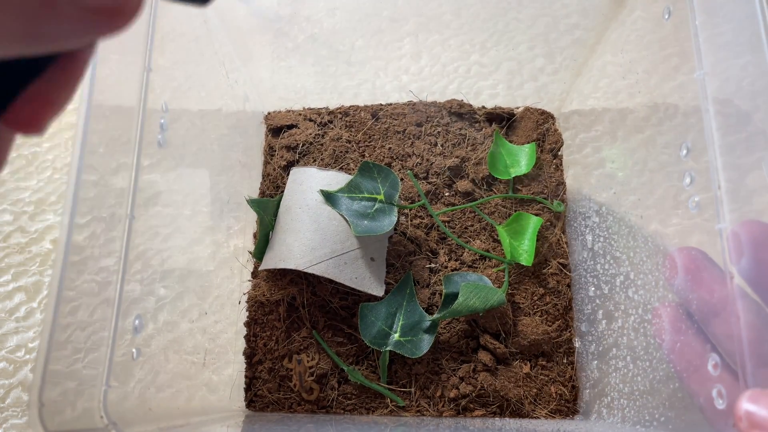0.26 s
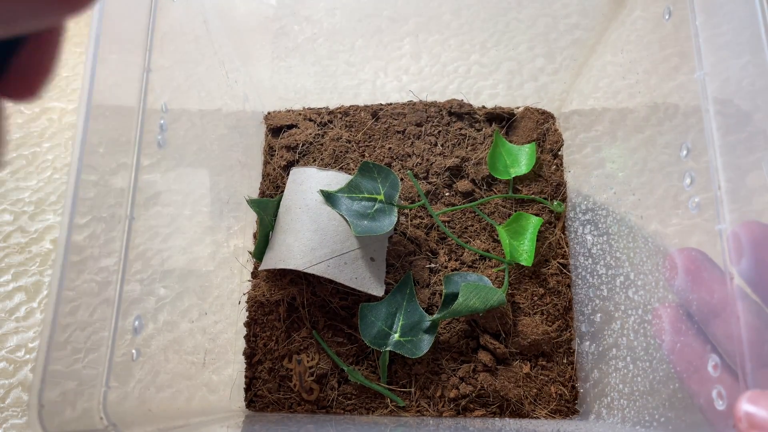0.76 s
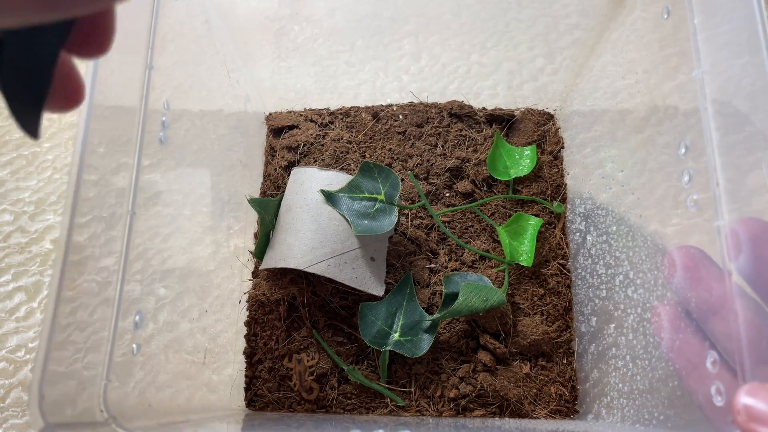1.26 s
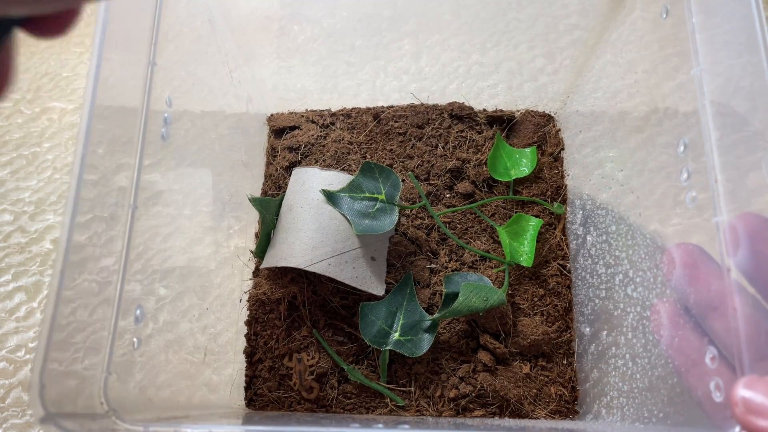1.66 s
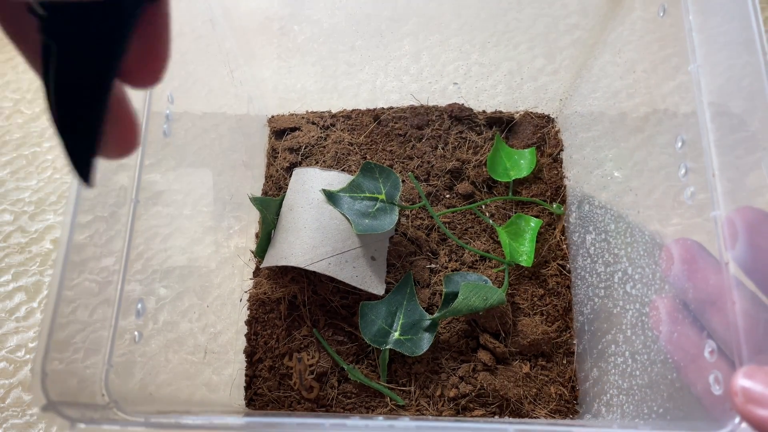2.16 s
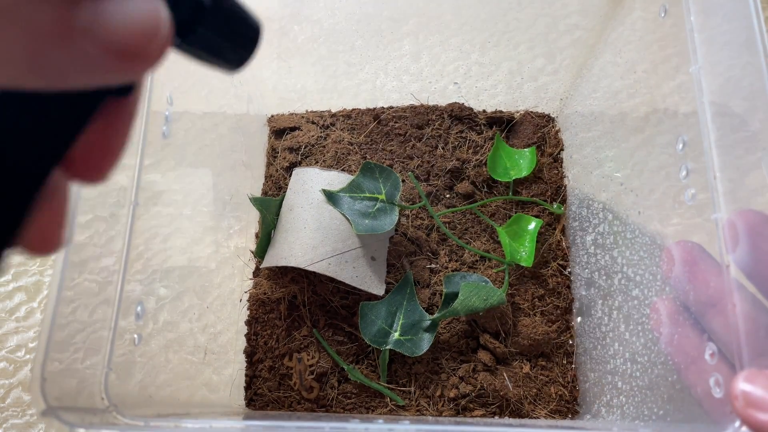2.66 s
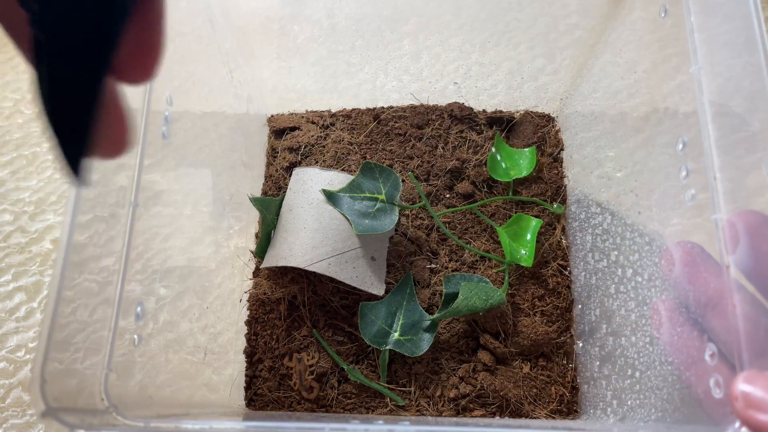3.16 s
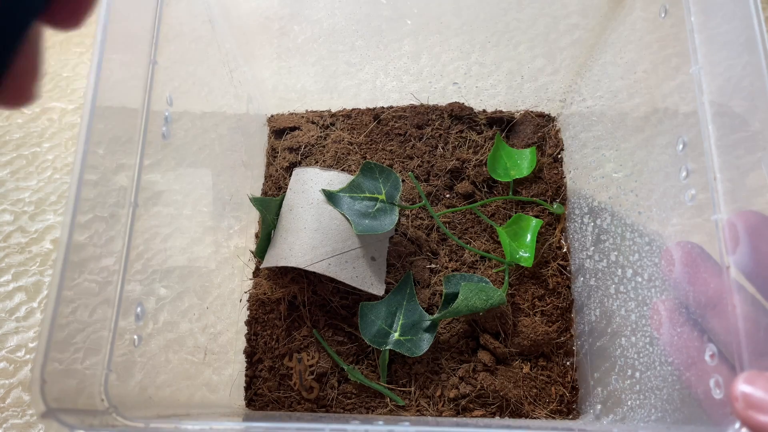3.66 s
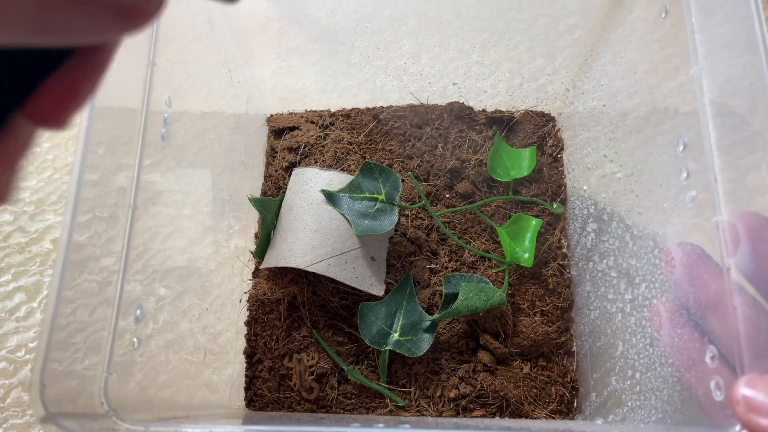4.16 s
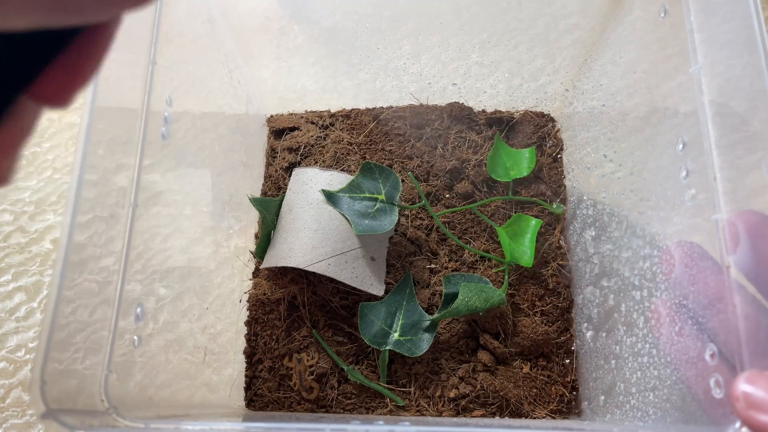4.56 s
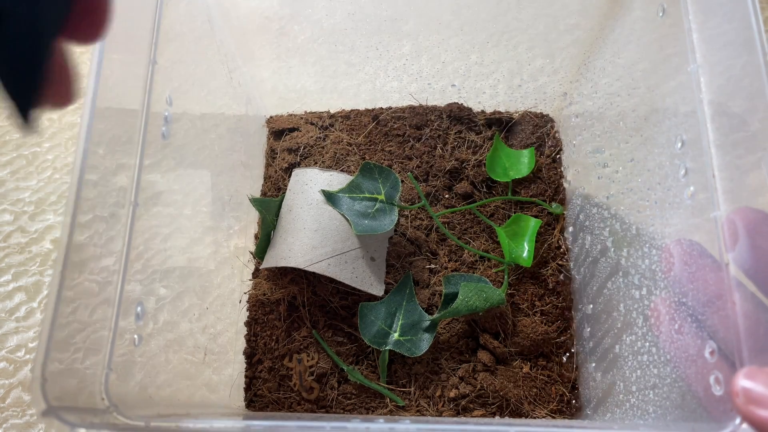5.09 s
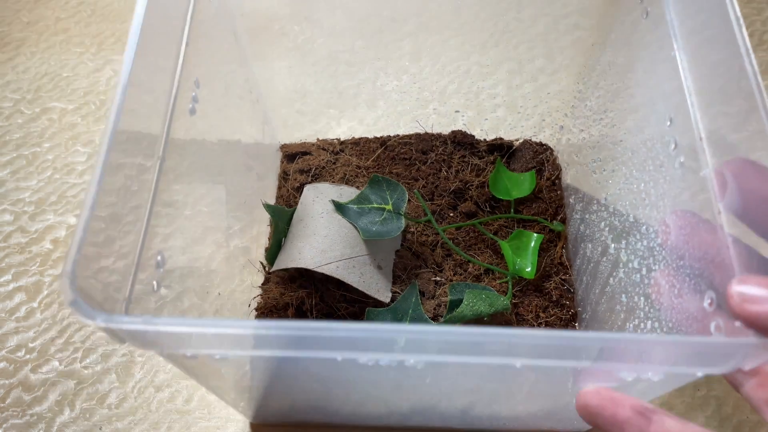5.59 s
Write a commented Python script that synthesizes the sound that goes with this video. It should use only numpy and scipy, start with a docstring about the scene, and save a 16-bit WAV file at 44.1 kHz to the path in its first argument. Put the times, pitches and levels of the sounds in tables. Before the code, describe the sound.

Rapid trigger pulls chatter and clack while short bursts of mist hiss into a plastic container of soil, heard close indoors.

```python
"""In a small quiet room, a hand spray bottle is pumped 21 times, ever more briskly, over a plastic tub of soil.
Each pull makes the pump chatter in a quickening run of ticks, built from impulses and noise, that knock the bottle.
Shaped random impacts then hiss as mist and rush into the tub; the trigger clacks back into its ringing spray head.
Gliding tones make the water's groans. At the end the lifted tub wobbles and knocks, with a faint, blurred, rising
tone. All is heard close."""
import sys
import numpy as np
from scipy import signal
from scipy.fft import irfft
from scipy.io import wavfile
from scipy.ndimage import uniform_filter1d

SR = 44100
rng = np.random.default_rng(int(sys.argv[2]) if len(sys.argv) > 2 else 0)


def generate_wav(sig):
    """Save sig (samples, or channels by samples) to the path in sys.argv[1] as 16-bit PCM at SR."""
    pcm = np.round(np.clip(np.atleast_2d(sig).T, -1, 1) * 32767).astype(np.int16)
    wavfile.write(sys.argv[1], SR, pcm)


N = 257217
HZ = np.fft.rfftfreq(4096, 1 / SR)
TIME = np.arange(N) / SR


def gain_of(db):
    """Decibels to gain."""
    return 10 ** (np.asarray(db) / 20)


def read(points, hz):
    """A spectrum, joined by straight lines over log frequency."""
    f, value = np.transpose(points)
    return np.interp(np.log(hz + 1), np.log(f + 1), value)


def at_time(curve, s):
    """A control curve, joined by straight lines over time."""
    return np.interp(s, *np.transpose(curve))


def add(mix, s, part):
    """Adds part to mix from time s on."""
    span = mix[max(round(s * SR), 0):][:len(part)]
    span += part[:len(span)]


def fall(db, decay_s):
    """Power of a blow that dies exponentially."""
    return gain_of(db) ** 2 * np.exp(-TIME[:SR // 10] / decay_s)


def swells(rows):
    """Power of short bursts that rise quickly and fade more slowly."""
    power = np.zeros(N)
    for s, db, length in rows:
        u = np.linspace(0, 1, max(int(length * SR), 8))
        add(power, s, gain_of(db) ** 2 * np.sin(np.pi * u ** 0.59) ** 2)
    return power


def flutter(depth_db, size):
    """Random unsteadiness of a flow, as a factor on its power."""
    wander = uniform_filter1d(uniform_filter1d(rng.standard_normal(N), size), size)
    return gain_of(depth_db * wander / wander.std()) ** 2


def fizz(power, grain_db=0., per_s=SR):
    """A random train of tiny impacts of uneven size that carries the given power."""
    hits = rng.random(N) < per_s / SR
    size = gain_of(grain_db * np.minimum(rng.exponential(1, N), 4)) * hits
    return rng.standard_normal((2, N)) * size / np.sqrt(np.mean(size ** 2)) * np.sqrt(power)


def blows(rows, spread=.0004):
    """Single clean impacts (s, dB over a millisecond), a random fraction of the spread later in one channel."""
    out = np.zeros((2, N))
    for (s, db), late in zip(rows, rng.random(len(rows))):
        push = gain_of([db]) * np.sqrt(SR / 1000)
        add(out[0], s, push)
        add(out[1], s + spread * late, push)
    return out


def from_left(x, right_db=-5):
    """A sound on the left is softer and a little later in the right channel."""
    return np.array([x, gain_of(right_db) * np.roll(x, 16)])


# stereo image by frequency:
# (frequency [Hz], left over right [dB], likeness [0-1], phase lead of the left [rad])
STEREO_IMAGE = [(60, 3, .9, 0), (450, 5.5, .88, 1.6), (1000, 6, .92, 3.1), (1800, 4.6, .78, 4.1),
                (2800, 4.5, .55, 7.7), (4800, 9, .25, 10.8), (6500, 5.3, .45, 12.1), (7800, 4.5, .7, 9.7),
                (8700, 2, .8, 9.4), (9700, -1, .88, 7.9), (10700, 0, .93, 6.5), (12400, 0, .94, 6),
                (14000, 0, .88, 3.5), (16000, 0, .92, 2.9)]


def ring(drive, spectrum, modes=(), image=STEREO_IMAGE):
    """Sends a drive through a causal resonant body and spreads it over a stereo image."""
    db = read(spectrum, HZ)
    db = db + sum(lift / (1 + (2 * (HZ - hz) / width) ** 2) for hz, width, lift in modes)
    gain = gain_of(db) / np.sqrt(np.mean(gain_of(db) ** 2))
    # minimum phase: the body answers only after it is struck
    log_gain = np.log(np.r_[gain, gain[-2:0:-1]] + 1e-5)
    body = np.exp(np.conj(signal.hilbert(log_gain)))[:len(HZ)]
    f, *columns = np.transpose(image)
    balance_db, same, lead = (np.interp(HZ, f, c) for c in columns)
    same, lean = np.clip(same, 0, 1), gain_of(balance_db)
    right = body * np.sqrt(2 / (1 + lean ** 2))
    # left, shared part of the right, and the right's independent part
    paths = [right * lean, right * same * np.exp(-1j * lead), right * np.sqrt(1 - same ** 2)]
    taps = np.roll(irfft(np.array(paths)), 64, axis=1)  # leaves space for a right channel that leads
    heard = signal.oaconvolve(drive[[0, 0, 1]], taps, axes=1)[:, 64:64 + N]
    return np.array([heard[0], heard[1] + heard[2]])


# trigger pulls: (time [s], chatter length [s], first gap [s], first tick before trim [dB],
# later ticks before trim [dB])
TRIGGER_PULLS = [(0.1627, 0.049, 0.013, -20.5, -21.5), (0.453, 0.031, .0113, -21, -21),
                 (0.7527, 0.026, 0.0098, -19, -23.5), (1.0496, 0.026, .0095, -20, -20.5),
                 (1.3531, 0.02, 0.0082, -26.5, -17.5), (1.6515, 0.018, 0.0089, -23, -19),
                 (1.951, 0.019, 0.0083, -24, -17.5), (2.1991, 0.021, 0.01, -17, -18.5),
                 (2.4375, 0.023, 0.0084, -22.5, -18.5), (2.6826, 0.022, 0.0093, -23.5, -19.5),
                 (2.9497, 0.031, 0.011, -18, -18.5), (3.1766, .024, 0.0085, -17, -19.5),
                 (3.405, 0.023, 0.0093, -22, -21.5), (3.6392, 0.024, 0.0085, -17.5, -21),
                 (3.849, 0.0178, .008, -22.5, -20), (4.0566, 0.023, 0.0095, -22, -21),
                 (4.28, 0.013, 0.0071, -27.5, -23), (4.5123, 0.018, 0.0077, -22, -21.5),
                 (4.7466, 0.022, 0.0084, -16, -17), (4.966, 0.013, 0.0099, -17, -14),
                 (5.1617, 0.026, .0098, -19.5, -18.5)]
# the trigger springing back, once before the first pull and once after each:
# (time [s], snap before trim [dB], ring of the spray head before trim [dB])
TRIGGER_RETURNS = [(0.056, -31, -43.5), (0.358, -24, -40.5), (0.6351, -20.5, -38.5), (0.9764, -29.5, -39.5),
                   (1.2535, -22.5, -38.5), (1.5834, -22.5, -40), (1.8517, -17.5, -38), (2.1328, -23, -36),
                   (2.3709, -26, -38), (2.611, -24, -36.5), (2.8924, -34, -41.5), (3.128, -21.5, -39.5),
                   (3.345, -30, -35.5), (3.5862, -24, -33.5), (3.8, -24.5, -38), (3.9984, -33, -43.5),
                   (4.2382, -31, -40.5), (4.4546, -31, -33), (4.6898, -22, -33.5), (4.9132, -20, -36.5),
                   (5.109, -21, -34), (5.296, -19, -36)]
# the finger eases off this long before a return; a full squirt empties the chamber
EASE_OFF_S, FULL_SQUIRT_S = 0.059, 0.1


def flow(level_curve, rise_s, hold, fade_db_per_s, sag_db, flight_s=0., db=0.):
    """Power of the jet after its flight: it builds up, sags as the piston travels, dies as pressure runs out."""
    power, t = np.zeros(N), TIME[:SR // 3]
    for (s, chatter_s, *_), (back_s, *_) in zip(TRIGGER_PULLS, TRIGGER_RETURNS[1:]):
        start = s + chatter_s
        length = np.clip(back_s - EASE_OFF_S - start, t[1], FULL_SQUIRT_S)
        sag = sag_db * (.5 - t / length)
        fade = fade_db_per_s * np.maximum(t - hold * length, 0)
        level = gain_of(db + at_time(level_curve, s) + sag - fade) ** 2
        add(power, start + flight_s, level * (1 - np.exp(-(t / rise_s) ** 2)))
    return power


def gripped(drive, spectrum, modes, detune, count=3):
    """Each stroke draws one of a few finger grips, which shifts the resonances of the spray head."""
    stroke = np.searchsorted([s for s, *_ in TRIGGER_RETURNS], TIME + EASE_OFF_S)
    grip = rng.integers(0, count, len(TRIGGER_RETURNS) + 1)[stroke]
    out = np.zeros((2, N))
    for k, scale in enumerate(1 + detune * np.linspace(-1, 1, count)):
        shifted = [(hz * scale, width, lift) for hz, width, lift in modes]
        out += ring(drive * (grip == k), spectrum, shifted)
    return out


# colour of the room air and rubbing: (frequency [Hz], relative level [dB])
QUIET_COLOUR = [(70, -10.5), (200, -21.5), (550, 6), (1100, 12), (4500, -2.5), (13000, -3.5),
                (16000, -31.5)]
# course of the room air and rubbing: (time [s], level [dB])
QUIET_LEVEL = [(0, -71), (5.3, -63.5), (5.6, -67.5), (5.72, -78.5), (5.83, -76.5)]


def rustle():
    """Faint room air and rubbing of the hand against the tub: gently wavering, coloured noise."""
    power = gain_of(at_time(QUIET_LEVEL, TIME)) ** 2
    return ring(fizz(power * flutter(1., size=1500)), QUIET_COLOUR)


# how long the room rings: (frequency [Hz], time to fall by 60 dB [s])
ROOM_DECAY = [(150, 0.11), (600, 0.15), (2000, 0.47), (5000, 0.28), (10000, 0.24), (16000, 0.073)]


def room(x, first_s=0.0056):
    """Sparse reflections of random sign, each band dying at its own speed, fed from the left channel."""
    signs = rng.choice([-1., 1.], (2, SR // 2))
    hits = rng.random((2, SR // 2)) < 4000 / SR
    taps = signs * hits * (TIME[:SR // 2] > first_s)
    hz, t, z = signal.stft(taps, SR, nperseg=256)
    decay = gain_of(-60 * t / read(ROOM_DECAY, hz)[:, None])
    tail = signal.istft(z * decay, SR, nperseg=256)[1]
    return signal.fftconvolve(x[:1], tail / np.linalg.norm(tail[0]), axes=1)[:, :N]


# the edge below which the bass thins out: (time [s], frequency [Hz])
BASS_EDGE = [(1.15, 29.8), (1.3, 419.5), (1.9, 925), (2.0, 426.6), (3.25, 237), (3.65, 464.4), (4.5, 352),
             (4.65, 100), (5.3, 267.2)]


def thin_bass(x, depth_db=-17.5, order=10):
    """The bass comes and goes: everything below a wandering edge is much weaker."""
    hz, t, z = signal.stft(x, SR, nperseg=512)
    above = (hz[:, None] / at_time(BASS_EDGE, t)) ** order
    gain = np.maximum(above / (1 + above), gain_of(depth_db))
    return signal.istft(z * gain, SR)[1][:, :N]


# gulps of the water in the bottle:
# (time [s], level [dB], length [s], starting pitch [Hz], final pitch [Hz])
WATER_GULPS = [(0.177, -52, 0.038, 70, 227), (0.366, -55, 0.073, 418, 300), (0.391, -57.5, 0.079, 65, 95),
               (0.457, -45.5, 0.055, 79.6, 282), (0.749, -50, 0.04, 130, 300), (1.05, -44, 0.043, 81, 256),
               (2.599, -49, 0.06, 584, 766), (2.962, -54, 0.046, 95, 171), (4.755, -51.5, 0.035, 130, 231),
               (4.975, -47, 0.032, 170, 224)]
# draught that a squirt throws at the microphone: (time [s], level [dB])
DRAUGHT_LEVEL = [(.16, -58), (.75, -59.5), (1.35, -90)]
# colour of hand and draught: (frequency [Hz], relative level [dB])
RUMBLE_COLOUR = [(25, -52), (60, -0.5), (260, -5.5), (450, -10), (1200, -53.5)]


def handling(grip_db=-69, grip_until_s=1.17, rest_db=-88, opening_db=-52, opening_s=0.016):
    """Water groans with an unsteady glide; at first the hand rumbles and draughts ruffle the microphone."""
    gulps = np.zeros(N)
    for s, db, length, first_hz, last_hz in WATER_GULPS:
        hz = np.geomspace(first_hz, last_hz, int(length * SR))
        hz = hz * (1 + uniform_filter1d(rng.standard_normal(len(hz)), size=100))
        tone = np.sin(2 * np.pi * np.cumsum(hz) / SR)
        add(gulps, s, gain_of(db) * np.sqrt(2) * tone * np.hanning(len(hz)))
    draught = flow(DRAUGHT_LEVEL, rise_s=0.017, hold=1.0, fade_db_per_s=136.0, sag_db=1.5, flight_s=0.016)
    add(draught, 0, fall(opening_db, opening_s))
    hand = gain_of(np.where(TIME < grip_until_s, grip_db, rest_db)) ** 2
    rumble = fizz((draught + hand) * flutter(2.14, size=700))
    return from_left(gulps) + ring(rumble, RUMBLE_COLOUR)


def rising_tone(s=5.595, length_s=0.063, hz=4750, glide_hz_per_s=11000, db=-71):
    """A faint, blurred, rising tone as the tub is lifted: a gliding sine scaled by slow noise."""
    out, t = np.zeros(N), TIME[:int(length_s * SR)]
    blur = uniform_filter1d(rng.standard_normal(len(t)), size=220)
    tone = np.sin(2 * np.pi * np.cumsum(hz + glide_hz_per_s * t) / SR)
    add(out, s, gain_of(db) * blur / blur.std() * tone * signal.windows.tukey(len(t), .5))
    return out


# knocks on the tub as it is lifted: (time [s], level before trim [dB])
LIFT_KNOCKS = [(5.592, -44.5), (5.7688, -63)]
# colour of the tub's knocked wall: (frequency [Hz], relative level [dB])
WALL_COLOUR = [(400, -13.5), (1000, -7), (1500, 8.5), (2400, -4), (3200, -13), (4300, 0), (7500, -33)]
# colour of shifting soil and of the jet's low rush: (frequency [Hz], relative level [dB])
RUSH_COLOUR = [(60, -25.5), (180, -5), (300, -5), (480, -0.5), (750, 2), (1100, -6), (2000, -6.5),
               (6000, -24)]
# resonances of the tub's hollow: (frequency [Hz], width [Hz], lift [dB])
TUB_MODES = [(357, 13, 6.5), (488, 130, 9.5), (736, 79, -6), (1058, 160, 9)]


def tub(flex_at=5.48, flex_hz=84, glide_hz_per_s=130, flex_db=-59, flex_s=0.053):
    """The lifted tub flexes with a low sinking wobble, its wall knocks, and the soil shifts."""
    knocks, wobble = np.zeros((2, N))
    for s, db in LIFT_KNOCKS:
        add(knocks, s, fall(db - 0.5, 0.0035))
    t = TIME[:SR // 4]
    swell = (t / flex_s * np.exp(1 - t / flex_s)) ** 3
    tone = np.sin(2 * np.pi * np.cumsum(flex_hz - glide_hz_per_s * t) / SR)
    add(wobble, flex_at, gain_of(flex_db) * swell * tone)
    wall = ring(fizz(knocks), WALL_COLOUR, [(2554, 130, 14)])
    soil = ring(fizz(swells([(5.615, -58.5, 0.047)])), RUSH_COLOUR, TUB_MODES)
    return wall + wobble + soil


# soft peeps of the valve, shortly before a few of the pulls: (time [s], level [dB])
VALVE_PEEPS = [(1.038, -43.5), (1.94, -42.5), (3.167, -43)]
PEEP_HZ, PEEP_S = 2200, 0.0085


def valve():
    """A very short soft peep from the valve: a sine with smoothed ends."""
    out, t = np.zeros(N), TIME[:int(PEEP_S * SR)]
    tone = np.sin(2 * np.pi * PEEP_HZ * t) * signal.windows.tukey(len(t), .5)
    for s, db in VALVE_PEEPS:
        add(out, s, gain_of(db) * 2 * tone)
    return from_left(out)


# colour of the swell before a pull and of the head's hollow note: (frequency [Hz], relative level [dB])
DULL_COLOUR = [(200, -22), (2250, -9.5), (16000, -25.5)]
# colour of the ticks: (frequency [Hz], relative level [dB])
TICK_COLOUR = [(200, -43), (3000, -10.5), (5000, -5.5), (7500, -4.5), (9500, 3), (10900, -3), (11900, -0.5),
               (15600, 1), (17000, -40)]


def lead_in(lead_s=0.016, length_s=0.021, swell_db=-52, tick_db=-19, tick_lead_s=0.0041):
    """A faint noisy swell and faint ticks lead into each pull, both made of sparse random impacts."""
    swell = swells([(s - lead_s, swell_db, length_s) for s, *_ in TRIGGER_PULLS])
    ticks = swells([(s - tick_lead_s, first_db + tick_db, 2 * tick_lead_s)
                    for s, _, _, first_db, _ in TRIGGER_PULLS])
    swelling = ring(fizz(swell, grain_db=6.5, per_s=5000), DULL_COLOUR, [(PEEP_HZ, 400, 10)])
    return swelling + ring(fizz(ticks, per_s=700), TICK_COLOUR)


# small clicks of the trigger as it catches, and a last faint one as it settles:
# (time [s], level before trim [dB])
TRIGGER_CLICKS = [(0.0488, -35), (0.623, -35), (1.243, -38), (1.837, -37.5), (3.1012, -34.5), (3.1197, -34),
                  (3.5772, -34), (3.779, -40), (4.3867, -31.5), (4.4448, -40.5), (4.8998, -31),
                  (5.3764, -49)]
# share of a strike that rings a dull, hollow note in the spray head: (time [s], level [dB])
HOLLOW_SHARE = [(.9, -6), (1.58, -0.5), (2.3, -15), (5.3, -19)]
# colours of the snap and of the clack: (frequency [Hz], relative level [dB])
SNAP_COLOUR = [(200, -40.5), (1000, -34.5), (3000, -31.5), (5000, -16.5), (7000, -2.5), (9000, 4),
               (11000, 2), (13000, 5), (15500, 5.5), (17000, -21.5)]
CLACK_COLOUR = [(400, -38), (900, -6), (3200, 1.5), (6800, -1.5), (8500, 2.5), (16000, 0)]
# resonances of the spray head: (frequency [Hz], width [Hz], lift [dB])
HEAD_MODES = [(1588, 140, 13.6), (2240, 300, 6.4), (2646, 180, 6), (4100, 570, 12), (4720, 210, 7.8),
              (5240, 480, 9.8)]


def trigger(snap_db=-5.0, tick_s=0.00103, tick_db=-7, stop_lag_s=.0012, strike_db=4.0, ring_s=0.0024,
            ring_db=4.5, slide_db=-10, slide_s=0.011, click_ring_db=-10):
    """The spring slides the trigger back and throws it on its stop, with small clicks; the spray head rings."""
    ticks, clacks = np.zeros((2, N))
    for s, db in TRIGGER_CLICKS:
        add(ticks, s, fall(db, tick_s))
        add(clacks, s, fall(db + click_ring_db, ring_s))
    slide_rise = np.linspace(0, 1, int(slide_s * SR)) ** 2
    for s, sharp_db, head_db in TRIGGER_RETURNS:
        stop_at = s + stop_lag_s
        add(ticks, s, fall(sharp_db + tick_db, tick_s))
        add(clacks, stop_at, fall(head_db + ring_db, ring_s))
        add(clacks, stop_at - slide_s, gain_of(head_db + slide_db) ** 2 * slide_rise)
    snaps = blows([(s + stop_lag_s / 2, db + snap_db) for s, db, _ in TRIGGER_RETURNS])
    strikes = blows([(s + stop_lag_s + tick_s, db + strike_db) for s, _, db in TRIGGER_RETURNS])
    hollow_drive = strikes * gain_of(at_time(HOLLOW_SHARE, TIME))
    hollow = ring(hollow_drive, DULL_COLOUR, [(2420, 400, 14)])
    snapping = ring(snaps + fizz(ticks), SNAP_COLOUR)
    return snapping + hollow + gripped(strikes + fizz(clacks), CLACK_COLOUR, HEAD_MODES, detune=0.064)


# vigour of the pumping, which drives the bottle's knock and the coarse spray: (time [s], relative level [dB])
PUMP_VIGOUR = [(.45, -4.5), (1.05, 0.5), (1.95, -1.5), (3.7, 2.5), (4.06, 0.5), (4.28, -1), (4.55, 2.5),
               (5.17, 3)]
# added resonance of the ticks: (frequency [Hz], width [Hz], lift [dB])
TICK_MODES = [(11300, 2000, 3.7)]
# colour of water knocking in the bottle: (frequency [Hz], relative level [dB])
KNOCK_COLOUR = [(60, -42.5), (250, -2), (450, -13.5), (800, -1.5), (1500, 5), (3200, -9.5), (5000, -6.5),
                (7500, 1), (9600, 5), (11000, -5), (13000, -1.5), (16000, -10.5)]
# resonances of the bottle: (frequency [Hz], width [Hz], lift [dB])
BOTTLE_MODES = [(642, 53, 9.5), (897, 187, 7.5), (1648, 280, 7.5), (2254, 157, 8), (2683, 206, 13.5),
                (3960, 1380, 14.5), (4706, 340, 10.5), (5530, 200, 9.5), (6200, 780, -5.5)]


def pump(shrink=.73, tick_db=-2, tick_fade_db=2.0, scrape_db=-1.5, scrape_s=0.0011, knock_lag=.42,
         bottle_db=-32.5, knock_db=2.5, rattle_db=4.5, rattle_s=0.0028, early_db=-7):
    """Chatters like a bouncing ball with shrinking gaps; part way through each, water knocks in the bottle."""
    ticks, knocks = [], []
    scrape, rattle = np.zeros((2, N))
    for s, length, first_gap, first_db, later_db in TRIGGER_PULLS:
        body_db = bottle_db + at_time(PUMP_VIGOUR, s)
        gaps = first_gap * shrink ** np.arange(6)
        tick_times = s + np.cumsum(gaps) - gaps
        for k, (at, gap) in enumerate(zip(tick_times, gaps)):
            knock_at = at + knock_lag * gap
            if knock_at > s + length:
                break
            db = later_db - tick_fade_db * (k - .5) if k else first_db
            ticks.append((at, db + tick_db))
            knocks.append((knock_at, body_db + knock_db))
            add(scrape, at - scrape_s / 2, fall(db + scrape_db, scrape_s))
            add(rattle, at, fall(body_db + early_db, rattle_s))
            add(rattle, knock_at, fall(body_db + rattle_db, rattle_s))
    thud = signal.lfilter([.35], [1, -.75], blows(knocks))  # water strikes more softly than plastic
    ticking = gripped(blows(ticks) + fizz(scrape), TICK_COLOUR, TICK_MODES, detune=0.049)
    return ticking + ring(thud + fizz(rattle, grain_db=5), KNOCK_COLOUR, BOTTLE_MODES)


def burble(low_hz=310, high_hz=600, per_s=110, swell_s=0.0054):
    """Short plops of random pitch and size, at unit power: the lumpy note of the jet in the hollow."""
    out, t = np.zeros(N), TIME[:SR // 10]
    swell = t * np.exp(-t / swell_s)
    for when, pitch, size in rng.random((int(per_s * N / SR), 3)):
        hz = low_hz + pitch * (high_hz - low_hz)
        add(out, when * N / SR, size ** 2 * swell * np.sin(2 * np.pi * hz * t))
    return out / out.std()


# the fine hiss as the nozzle is swung about: (time [s], level [dB])
HISS_LEVEL = [(.16, -51), (.45, -41.5), (1.05, -45.5), (1.35, -39.5), (1.65, -40), (2.3, -44),
              (2.95, -43.5), (3.4, -46), (4.06, -42.5), (4.51, -39), (4.97, -39.5), (5.16, -45.5)]
# the low rush in the tub, before trim: (time [s], level [dB])
RUSH_LEVEL = [(.16, -48.5), (.75, -45), (1.05, -52.5), (1.35, -60.5), (1.65, -64), (1.95, -63.5),
              (2.2, -52.5), (2.44, -49.5), (3.18, -45.5), (3.64, -55.5), (3.85, -42.5), (4.28, -47),
              (4.55, -43), (5.16, -48.5)]
# the nozzle spits air: (time [s], level [dB], length [s])
AIR_SPITS = [(.503, -26.5, 0.019), (.536, -30.5, 0.0052), (1.742, -34.5, 0.015), (3.019, -29, 0.0017),
             (4.7935, -33, 0.0085)]
# splashes in the tub's hollow, before trim: (time [s], level [dB], length [s])
TUB_SPLASHES = [(.24, -50, 0.096), (2.6, -57, 0.029), (2.734, -48.5, 0.03), (3.014, -45, 0.038),
                (3.22, -45.5, 0.052), (3.275, -46, 0.064), (4.1, -50, 0.079)]
# colours of the fine hiss and of the coarse spray: (frequency [Hz], relative level [dB])
HISS_COLOUR = [(500, -37.5), (1500, -12.5), (4000, 0), (6000, 0.5), (8000, -1.5), (9400, 2.5), (11000, 1),
               (13000, -1.5), (15500, -5), (16300, -34.5)]
SPRAY_COLOUR = [(200, -48), (500, -37.5), (800, -4.5), (1150, 2), (1800, -5), (2700, -1.5), (3400, -4.5),
                (5000, -6), (9000, -19), (16000, -36.5)]
# stereo image of the mist, more diffuse in the middle range, nearly alike in the high treble:
# (frequency [Hz], left over right [dB], likeness [0-1], phase lead of the left [rad])
MIST_IMAGE = [(480, 4, .78, .8), (850, 5, .3, 2), (2200, 2.5, .1, 6), (6500, 4, .35, 12.1),
              (7800, 2, .8, 9.5), (9700, -.8, .65, 8.2), (10700, 0, .97, 6.3), (12700, 0, .96, 6.2),
              (13700, 0, .94, 3.2)]


def mist(opening_db=-52, opening_s=0.029, burble_db=-8, rush_db=-2.5):
    """Fine drops hiss at the nozzle, coarser ones pepper the soil, the largest splatter and burble in the tub."""
    fine = flow(HISS_LEVEL, rise_s=0.029, hold=0.72, fade_db_per_s=195.5, sag_db=4.5)
    fine *= flutter(1., size=160)
    coarse = flow(PUMP_VIGOUR, rise_s=0.026, hold=1.0, fade_db_per_s=166.0, sag_db=7.0,
                  flight_s=0.012, db=-45.5)
    coarse *= flutter(1.5, size=160)
    rush = flow(RUSH_LEVEL, rise_s=0.012, hold=0.96, fade_db_per_s=150.0, sag_db=1.5, flight_s=0.017)
    for power in (fine, coarse, rush):
        add(power, 0, fall(opening_db, opening_s))  # an earlier squirt is just dying away
    splashes = swells(TUB_SPLASHES)
    nozzle = fizz(fine, grain_db=4.5, per_s=26000) + fizz(swells(AIR_SPITS), grain_db=4.0)
    hiss = ring(nozzle, HISS_COLOUR, image=MIST_IMAGE)
    spray = ring(fizz(coarse, grain_db=0.0, per_s=6000), SPRAY_COLOUR, image=MIST_IMAGE)
    splatter = fizz(rush + splashes, grain_db=1.5, per_s=900)
    hollow = gain_of(rush_db) * ring(splatter, RUSH_COLOUR, TUB_MODES, MIST_IMAGE)
    lumps = from_left(np.sqrt(gain_of(burble_db) ** 2 * rush + splashes) * burble())
    return hiss + spray + hollow + lumps


def scene():
    """Bottle, mist and tub in a quiet room."""
    clicks = lead_in() + valve() + pump() + trigger()
    spray, lifted = mist(), tub() + rising_tone()
    echo = room(gain_of(-17.0) * clicks + gain_of(-15.0) * spray + gain_of(-13.0) * lifted)
    return thin_bass(clicks + spray + rustle() + echo) + lifted + handling()


def record(dry, edge_hz=16500):
    """The recorder's band limit: a steep low-pass filter."""
    taps = signal.firwin(255, edge_hz, window=("kaiser", 9), fs=SR)
    return signal.oaconvolve(dry, taps[None], "same")


dry = scene()
out = record(dry)
generate_wav(out)
```